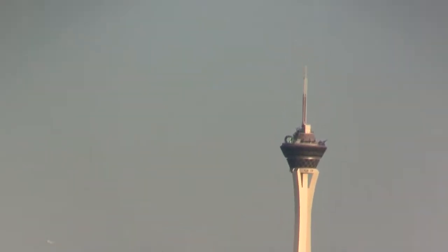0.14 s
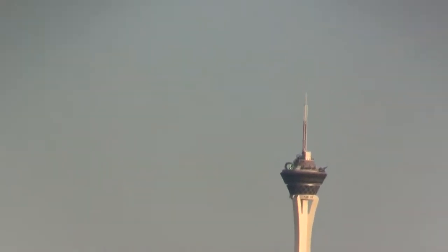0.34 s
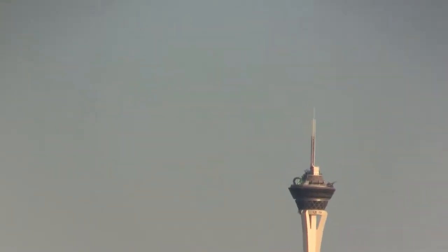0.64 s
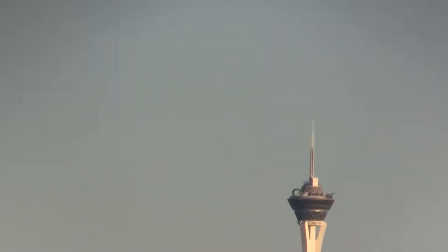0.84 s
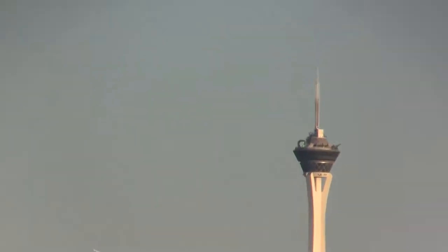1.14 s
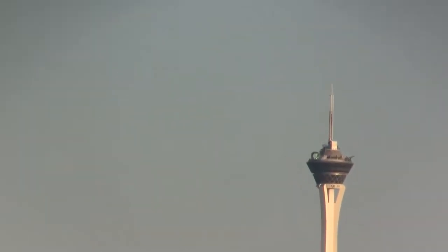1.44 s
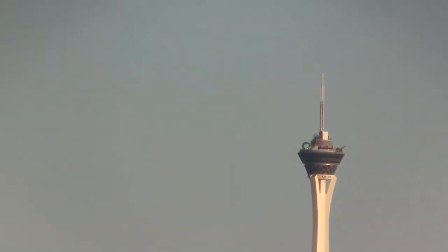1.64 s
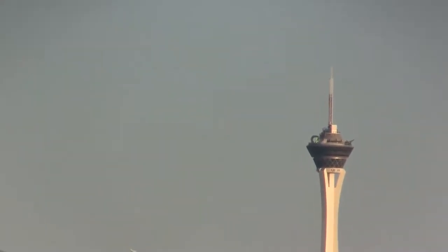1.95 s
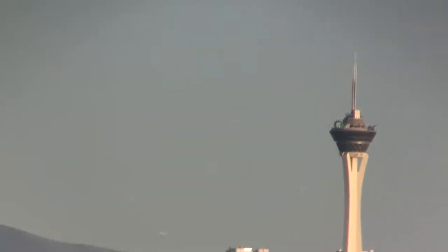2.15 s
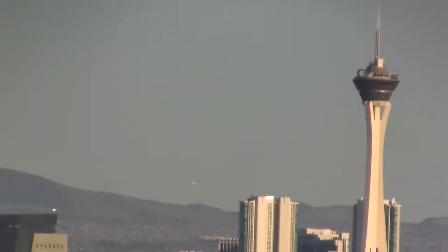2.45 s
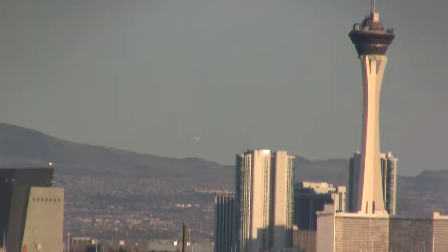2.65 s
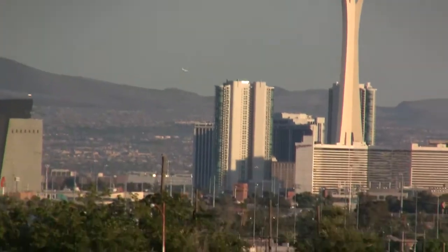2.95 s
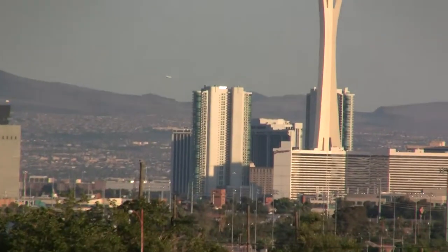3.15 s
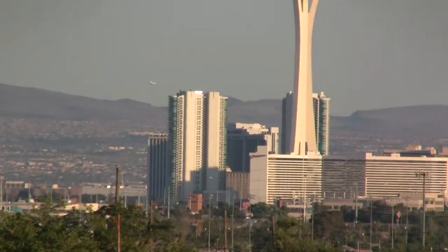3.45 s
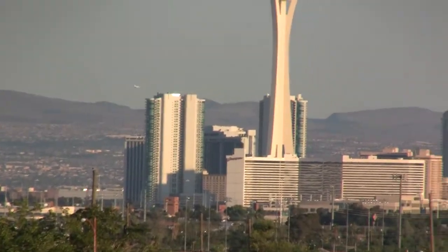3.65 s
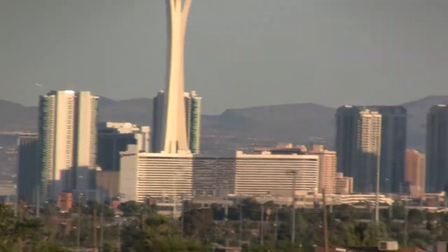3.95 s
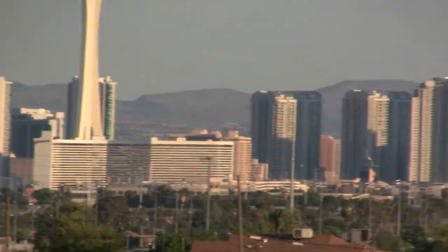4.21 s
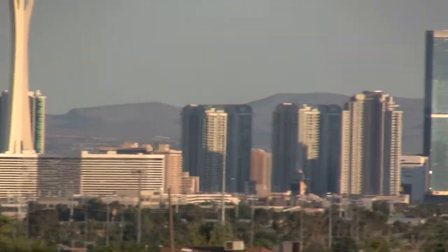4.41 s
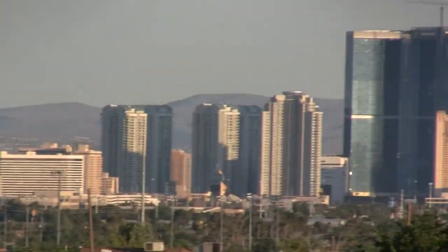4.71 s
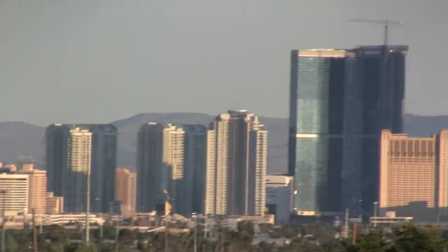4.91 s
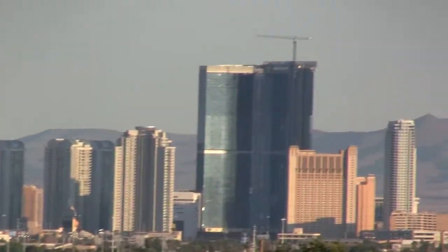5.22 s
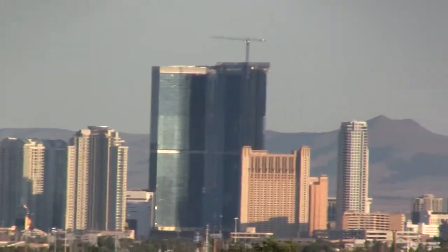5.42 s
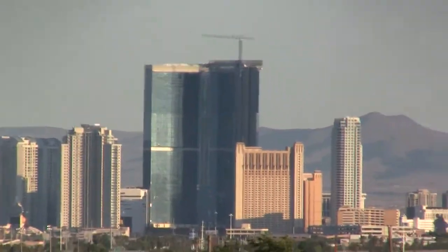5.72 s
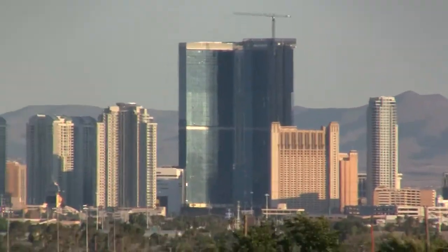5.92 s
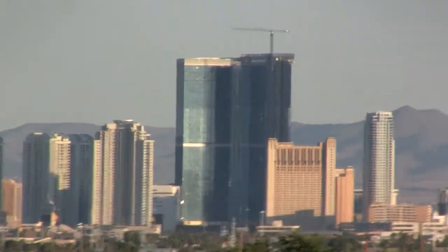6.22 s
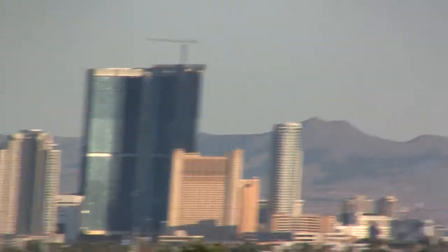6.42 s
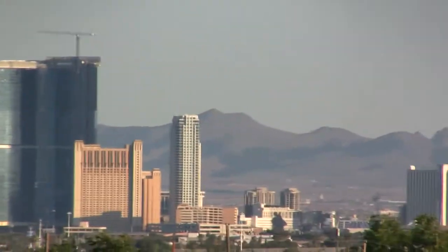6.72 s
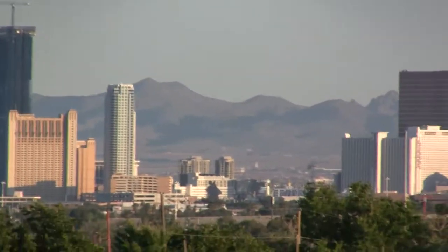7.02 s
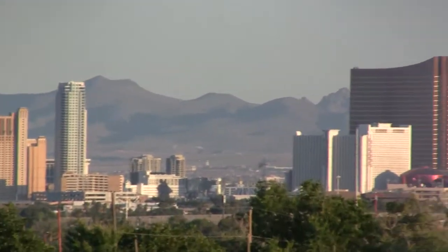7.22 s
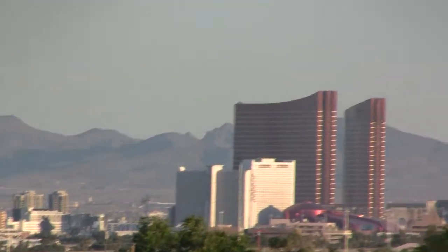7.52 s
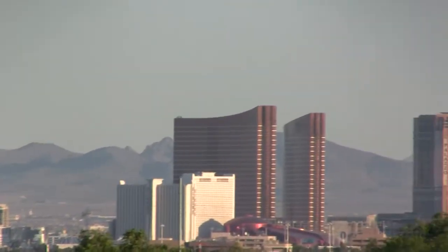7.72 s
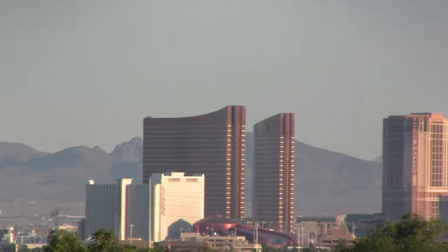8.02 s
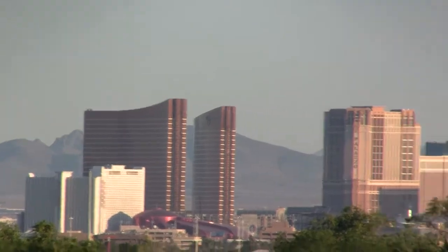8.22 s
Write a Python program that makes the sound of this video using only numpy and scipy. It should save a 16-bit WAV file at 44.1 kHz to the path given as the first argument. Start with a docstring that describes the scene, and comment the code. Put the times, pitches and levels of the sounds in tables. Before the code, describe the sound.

Gusty wind buffets an outdoor microphone in uneven low rumbles, roars hard, then calms to distant city hum with faint ticks before weaker gusts return.

```python
"""Gusty wind buffets the two ports of a small stereo microphone outdoors, mostly the left one.
It starts rough, eases, roars from about 1.6 to 3.2 s with brief whines, and calms after 4 s; faint ticks
follow, then weaker gusts return from 6.4 s. The wind is shaped noise, in a steady roar and short bursts.
City rumble (noise bands), a machine hum (sine tones) and preamp hiss (noise) lie beneath throughout;
each tick rings a few resonances of the housing."""
import sys
import numpy as np
from scipy import signal
from scipy.fft import rfft, irfft
from scipy.io import wavfile
from scipy.ndimage import uniform_filter1d

SR = 44100
rng = np.random.default_rng(int(sys.argv[2]) if len(sys.argv) > 2 else 0)


def volts(x):
    """Linear amplitude factor 10**(x/20) for a level x in dB, scalar or array-like."""
    e = np.asarray(x, float) / 20
    return 10 ** e


def digitize_waveform(pressure):
    """Quantize a signal to 16-bit integers and store it at the path in sys.argv[1].

    Rows of a 2-D input are taken as channels; values are limited to [-1, 1].
    """
    field = np.atleast_2d(pressure).T
    bounded = np.clip(field, -1, 1)
    quanta = np.round(bounded * 32767).astype(np.int16)
    wavfile.write(sys.argv[1], SR, quanta)


N = 368676

# Spectrum of an eddy: frequency over its pitch [ratio], relative level per Hz [level/dB]
EDDY_SPECTRUM = [(.1, -41), (.25, -13), (.5, -3.5), (.9, 4), (1.4, -3), (2.2, -14), (3.5, -30), (6, -58),
                 (12, -73)]
# Wind level [dB] that counts as calm
CALM_DB = -49


def rms_one(x):
    """Scale to rms 1."""
    return x / np.sqrt(np.mean(x ** 2) + 1e-20)


def in_time(rows):
    """Turn a table of times and levels into one level a sample."""
    s, level_db = np.transpose(rows)
    return np.interp(np.arange(N) / SR, s, level_db)


def at_hz(points, hz):
    """Read a spectrum on a log frequency axis."""
    table_hz, level_db = np.transpose(points)
    return np.interp(np.log(hz), np.log(table_hz), level_db)


def drift(rate_hz):
    """Slow random wandering with rms 1, made by smoothing noise at a fortieth of the sample rate."""
    step = 40
    r = np.exp(-2 * np.pi * rate_hz * step / SR)
    noise = rng.standard_normal(N // step + 2002)
    slow = signal.lfilter([1], [1, -2 * r, r * r], noise)[2000:]   # skip the start-up of the filter
    return np.interp(np.arange(N) / step, np.arange(len(slow)), rms_one(slow))


def coloured(spectrum, size):
    """White noise shaped to a spectrum, rms 1."""
    hz = np.fft.rfftfreq(size, 1 / SR) + 1   # the 1 avoids the log of zero
    shaped = rfft(rng.standard_normal(size)) * volts(at_hz(spectrum, hz))
    return rms_one(irfft(shaped, size))


def bands(top_hz):
    """Third-octave noise bands in pairs, neighbours unrelated; yields centre and pair."""
    edges = 25 * 2 ** np.arange(0, np.log2(top_hz / 25), 1 / 3)
    white = rng.standard_normal((2, 2, N))
    for k, (low, high) in enumerate(zip(edges, edges[1:])):
        sos = signal.butter(2, [low, high], "band", fs=SR, output="sos")
        yield np.sqrt(low * high), signal.sosfilt(sos, white[k % 2])


def hiss():
    """Preamp noise: random voltage, almost unrelated in the two channels."""
    # Colour of the hiss: [f/Hz, relative level per Hz/dB]
    hiss_spectrum = [(880, -7.5), (1500, 3), (1900, 1), (3480, -4), (15100, -10.5), (16000, -16.5)]
    level_db, alike = -62, 0.092   # alike: 0 unrelated channels, 1 identical
    mid, side = coloured(hiss_spectrum, N), coloured(hiss_spectrum, N)
    stereo = np.sqrt(1 + alike) * mid + np.sqrt(1 - alike) * side * [[1], [-1]]
    return volts(level_db) * stereo / np.sqrt(2)


def whine_level():
    """Level of the whine in dB: each spell fades in and out of a faint resting level."""
    # Spells of the whine: [start t/s, length/s, level/dB]
    spells = [(2.046, 0.62, -57.5), (2.95, 0.67, -62.5), (3.75, 0.25, -65), (4.6, 0.86, -64.5),
              (7.752, 0.57, -59.5)]
    rest_db, fade_s = -69.5, 0.12
    t = np.arange(N) / SR
    level_db = np.full(N, rest_db)
    for s, length, db in spells:
        on = np.clip(np.minimum(t - s, s + length - t) / fade_s, 0, 1)
        level_db = level_db + on * (db - rest_db)
    return level_db


def machine(waver_db, whine_waver_db, wobble):
    """Steady partials heard from afar: moving air makes level and phase (wobble, radians) waver."""
    # Hum of a far motor: [multiple of its rate, level/dB]
    hum = [(4, -60.5), (8, -63), (12, -75), (14, -70), (15, -65), (16, -69.5), (17, -74), (20, -66.5),
           (22, -79)]
    # A lone tone: [f/Hz, level/dB]
    drone = (360.5, -58.5)
    motor_hz, whine_hz = 55.31, 1311.5
    steady = [(multiple * motor_hz, db) for multiple, db in hum] + [drone]
    tones = [(hz, db + waver_db * drift(0.84)) for hz, db in steady]
    tones.append((whine_hz, whine_level() + whine_waver_db * drift(2.9)))
    t = np.arange(N) / SR
    out = 0
    for hz, db in tones:
        phase = 2 * np.pi * hz * t + wobble * drift(2.95)
        out = out + np.sqrt(2) * volts(db) * np.sin(phase)
    return out


def city(patchy_db, swell_from_hz):
    """Far rumble, nearly alike on both sides in the bass; passing traffic swells its upper part."""
    # Colour of the rumble: [f/Hz, relative level per Hz/dB]
    rumble = [(20, -25), (85, -7), (112, -3.5), (189, -1.5), (226, 0.5), (447, -7.5), (558, -13),
              (784, -10), (1270, -16), (1520, -27.5), (1800, -41.5), (3000, -60.5), (4000, -70)]
    # Stereo width: [f/Hz, side minus mid level/dB]
    rumble_width = [(60, -37), (250, -13.5), (600, -3.5), (1600, -9.5)]
    # Swell of the upper rumble: [t/s, level/dB]
    traffic = [(0, -0.5), (1.2, -2.5), (2.2, 4.5), (3.3, -1.5), (4, -2), (5.2, 1), (6.4, -4), (7.5, -3),
               (8.36, -1)]
    level_db = -43
    swell_db = in_time(traffic)
    out, together = 0, drift(0.99)
    for hz, (mid, side) in bands(top_hz=2600):
        share = np.clip(np.log2(hz / swell_from_hz), 0, 1)   # full swell an octave up
        patches_db = patchy_db * (0.5 * together + drift(5.0))
        gain = volts(at_hz(rumble, hz) + share * swell_db + patches_db)
        out = out + gain * (mid + volts(at_hz(rumble_width, hz)) * side * [[1], [-1]])
    return volts(level_db) * rms_one(out)


def tick():
    """Small taps ring the housing briefly; a harder tap favours the upper modes."""
    # Taps: [t/s, strength/dB, hardness/dB per octave]
    taps = [(4.5941, -45.5, -10), (5.827, -47.5, -2), (6.299, -54, 4)]
    # Resonances of the housing: [f/Hz, level/dB, time to fall by 60 dB/s]
    modes = [(1260, 9.5, .01), (1900, 1, 0.0086), (4800, -3, .004)]
    out = 0
    for hz, mode_db, t60 in modes:
        clicks = np.full(N, 1e-18)   # not quite zero, so the filter stays fast
        for s, db, hardness in taps:
            octaves = np.log2(hz / modes[0][0])
            clicks[round(s * SR)] = volts(db + mode_db + hardness * octaves)
        r, w = volts(-60 / (t60 * SR)), 2 * np.pi * hz / SR
        out = out + signal.lfilter([0, np.sin(w)], [1, -2 * r * np.cos(w), r * r], clicks)
    return out


def wind():
    """Wind level in dB and eddy pitch in Hz: stronger wind sheds smaller, higher eddies."""
    # Strength of the wind on the ports: [t/s, relative level/dB]
    gusts = [(0, -30), (.14, -32.5), (.2, -38.5), (.3, -34), (.36, -45.5), (.8, -46.5), (1.55, -51),
             (1.68, -33), (1.85, -36.5), (2.0, -33.5), (2.06, -24), (2.3, -25), (2.48, -42), (2.61, -32),
             (2.67, -22.5), (2.87, -31.5), (2.97, -23), (3.1, -33), (3.35, -43.5), (3.55, -29.5),
             (3.65, -43), (3.75, -34), (3.9, -45), (4.4, -59.5), (6.0, -61), (6.45, -48), (6.95, -57),
             (7.5, -48), (8.1, -47.5), (8.26, -39), (8.36, -41)]
    calm_pitch_hz, octaves_per_db = 135, 0.017
    veer_from_s, veer_to_s, veer_octaves = 2.5, 4.2, 0.31   # for a while the eddies run higher
    level_db, t = in_time(gusts), np.arange(N) / SR
    veering = (t > veer_from_s) & (t < veer_to_s)
    octaves = octaves_per_db * (level_db - CALM_DB) + veer_octaves * veering
    return level_db, calm_pitch_hz * 2 ** octaves


def buffeting(lumpy_db, own_db):
    """Turbulent pressure at each port: higher pitch means smaller, faster eddies; it comes in lumps."""
    right_port_db, swirl_spread_db = -7, 4.5   # the right port is sheltered
    wind_db, pitch = wind()
    swirl_db = swirl_spread_db * drift(4.5)   # shifts the balance at random
    port_db = [wind_db + swirl_db / 2, wind_db + right_port_db - swirl_db / 2]
    lumps = np.array([drift(10.4) + 0.5 * drift(45) for port in range(2)])
    lump_gain = volts(lumpy_db * lumps)
    out, power = 0, 0
    for hz, pair in bands(top_hz=1700):
        gain = volts(at_hz(EDDY_SPECTRUM, hz / pitch))
        power = power + gain ** 2 * hz * 0.46 / SR   # share of white noise in a third octave
        out = out + pair * (gain * volts(own_db * drift(hz / 12)))
    even = out / np.sqrt(power)
    return even * lump_gain / np.sqrt(np.mean(lump_gain ** 2)) * volts(port_db)


def stray_puffs():
    """Rows for the lesser eddies, at random moments, sized by the wind."""
    mean_gap_s, usual_ms = 0.11, 12.2
    over_wind_db, scatter_db = 5.5, 3.5
    thins = 0.36   # dB lost per dB of wind over calm: in a gust they merge into the roar
    wind_db, pitch = wind()
    gap, side = rng.random((2, 400))
    size, tone, length = rng.standard_normal((3, 400))
    s = np.cumsum(2 * mean_gap_s * gap)
    at = (s[s < N / SR] * SR).astype(int)
    rows = []
    for k, i in enumerate(at):
        merged_db = thins * max(wind_db[i] - CALM_DB, 0)
        db = wind_db[i] + over_wind_db - merged_db + scatter_db * size[k]
        hz = pitch[i] * 2 ** (0.24 * tone[k])
        ms = usual_ms * 2 ** (0.68 * length[k])
        rows.append((i / SR, db, hz, ms, float(side[k] > 0.7)))   # three in ten on the right
    return rows


def puffs(spread, tail, evenness, plateau_ms):
    """Each eddy is one swell of turbulent pressure: a few cycles, dying a little slower than it rose."""
    # The loudest eddies: [peak t/s, relative level/dB, pitch f/Hz, nominal length/ms, port 0 left 1 right]
    loudest = [(0.012, -30, 180, 13, 0), (0.057, -26, 194, 10, 0), (0.106, -23, 180, 11, 0),
               (0.15, -28, 184, 31, 0), (0.211, -28, 170, 7.6, 0), (0.259, -24.5, 203, 61, 0),
               (0.462, -32.5, 198, 35, 0), (0.55, -36.5, 120, 35, 1), (0.998, -35, 142, 31, 0),
               (1.642, -15.5, 179, 7.4, 0), (1.678, -25, 199, 10.4, 0), (1.715, -28, 160, 12, 0),
               (1.795, -23, 225, 18.6, 0), (1.884, -37, 150, 23, 1), (1.921, -28.5, 260, 5.2, 0),
               (1.974, -27.5, 203, 17, 0), (2.043, -22.5, 255, 6.7, 0), (2.061, -14, 156, 16.6, 0),
               (2.102, -21.5, 236, 13, 1), (2.187, -24, 220, 22, 0), (2.243, -21, 195, 15, 0),
               (2.285, -22.5, 160, 4.8, 0), (2.351, -19.5, 280, 54, 0), (2.539, -35, 190, 10, 1),
               (2.588, -15.5, 340, 9, 1), (2.685, -17, 284, 4.6, 0), (2.71, -23, 240, 8, 0),
               (2.729, -17, 292, 7.4, 0), (2.764, -14.5, 273, 12, 0), (2.839, -16.5, 242, 13.3, 0),
               (2.875, -25.5, 233, 43, 0), (3.034, -18.5, 347, 17, 1), (3.07, -18, 328, 6.7, 1),
               (3.121, -31, 235, 21, 0), (3.189, -29.5, 173, 6, 0), (3.27, -31.5, 182, 17, 0),
               (3.418, -27, 188, 15, 0), (3.455, -29, 245, 29, 0), (3.52, -20, 238, 24, 0),
               (3.717, -26.5, 214, 25, 0), (3.779, -25, 240, 9, 0), (3.9, -36, 197, 30, 0),
               (3.992, -39, 149, 13, 0), (5.94, -36.5, 167, 12, 0), (6.272, -32.5, 196, 11.6, 0),
               (6.703, -27, 156, 37, 0), (6.865, -33.5, 172, 8.3, 0), (7.097, -34.5, 118, 14, 1),
               (7.615, -34, 153, 11, 1), (7.718, -34.5, 146, 8.5, 0), (8.166, -24.5, 214, 12.3, 1),
               (8.248, -33.5, 163, 39, 0), (8.294, -36, 158, 15, 0)]
    size = 4096
    out = np.zeros((2, N + 16384))
    t = (np.arange(size) - size // 2) / SR
    for s, db, hz, ms, port in [*loudest, *stray_puffs()]:
        width = spread * ms / 1000 * np.where(t > 0, tail, 1)
        # long eddies hold, then stop short
        swell = np.exp(-0.5 * np.abs(t / width) ** (2 + ms / plateau_ms))
        flow = coloured([(ratio * hz, level) for ratio, level in EDDY_SPECTRUM], size)
        cycle = round(SR / hz)
        cycle_power = uniform_filter1d(uniform_filter1d(flow ** 2, size=cycle), size=cycle)
        # even out the noise so the burst follows its swell
        burst = swell * flow / cycle_power ** (evenness / 2)
        burst = burst * np.sqrt(np.sum(swell ** 2) / np.sum(burst ** 2))
        at = round(s * SR) + size // 2
        out[int(port > 0.5), at:at + size] += volts(db) * burst
    return out[:, size:size + N]


def wind_filter(x, share, q):
    """Second-order bass cut, worked in blocks; its corner is a share of a base that is raised for a while."""
    base_hz, raised_hz, raised_from_s, raised_to_s = 174, 270, 2.5, 6.45
    t = np.arange(N) / SR
    raised = (t > raised_from_s) & (t < raised_to_s)
    corner = 2 * np.pi * share * np.where(raised, raised_hz, base_hz)
    out, state = np.zeros_like(x), np.zeros(x.shape[:-1] + (2,))
    for i in range(0, N, 2048):
        b, a = signal.bilinear([1, 0, 0], [1, corner[i] / q, corner[i] ** 2], SR)
        block = slice(i, i + 2048)
        out[..., block], state = signal.lfilter(b, a, x[..., block], zi=state)
    return out


def widen(ports):
    """The port difference loses its bass and top, is boosted and put back against the sum."""
    boost_db, top_hz = 7, 3000
    side = wind_filter(ports[0] - ports[1], share=1, q=0.53)
    b, a = signal.butter(1, top_hz, fs=SR)
    side = volts(boost_db) * signal.lfilter(b, a, side)
    return ports.sum(axis=0) + side * [[1], [-1]]


def scene():
    """Wind on the ports, far sounds, the ticks and the hiss, some with a slight left-right balance in dB."""
    eddy_top_hz = 1310
    far = city(patchy_db=0.47, swell_from_hz=325)
    far = far + machine(waver_db=3.5, whine_waver_db=2.5, wobble=1.44) * volts([[-0.7], [0.7]])
    ports = buffeting(lumpy_db=3.0, own_db=1.5)
    ports = ports + puffs(spread=0.41, tail=1.18, evenness=0.52, plateau_ms=41)
    # keep the wind noise low: steep cut above eddy_top_hz
    ports = signal.sosfilt(signal.butter(4, eddy_top_hz, fs=SR, output="sos"), ports)
    air = widen(ports) + far * volts([[-0.3], [0.3]]) + tick()
    return wind_filter(air, share=0.25, q=0.63) + hiss() * volts([[-0.4], [0.4]])


def band_limit(x):
    """A steep low-pass at the top of the band."""
    return signal.sosfilt(signal.butter(12, 16160, fs=SR, output="sos"), x)


def record(dry):
    """Store the finished mix."""
    return band_limit(dry)


dry = scene()
out = record(dry)
digitize_waveform(out)
```